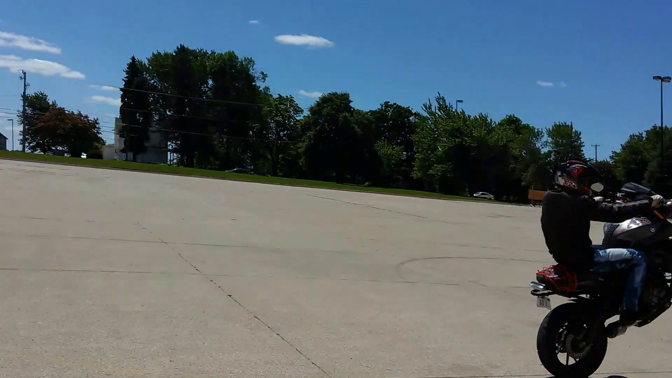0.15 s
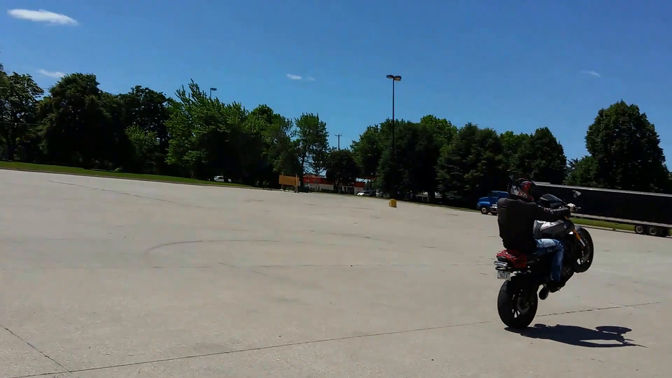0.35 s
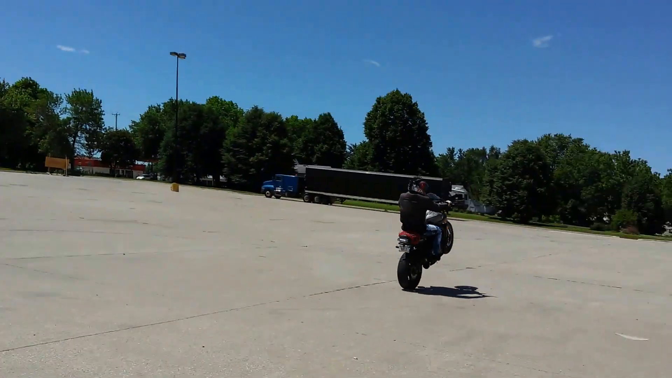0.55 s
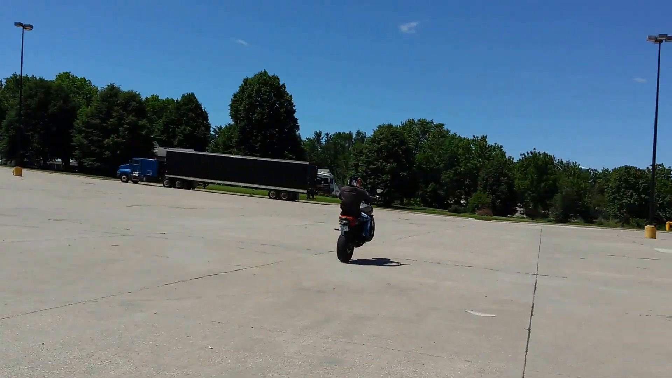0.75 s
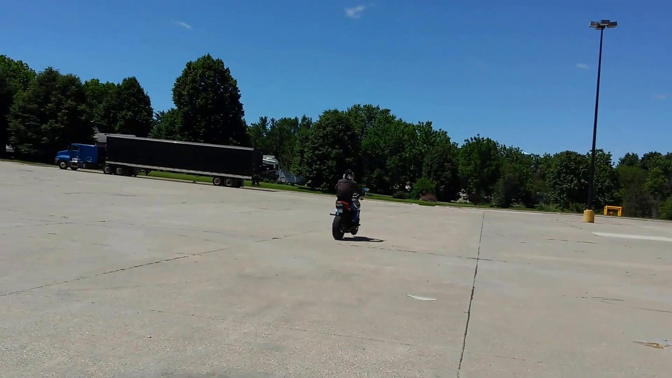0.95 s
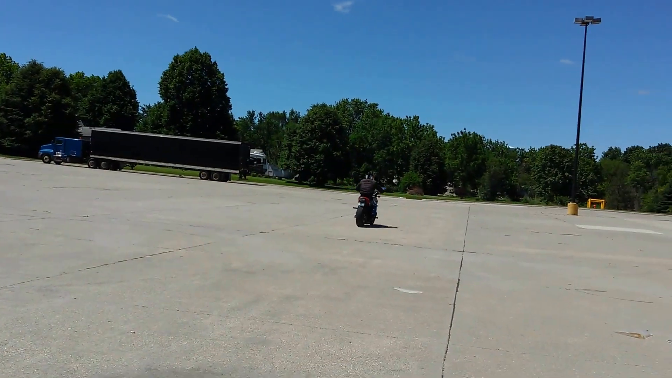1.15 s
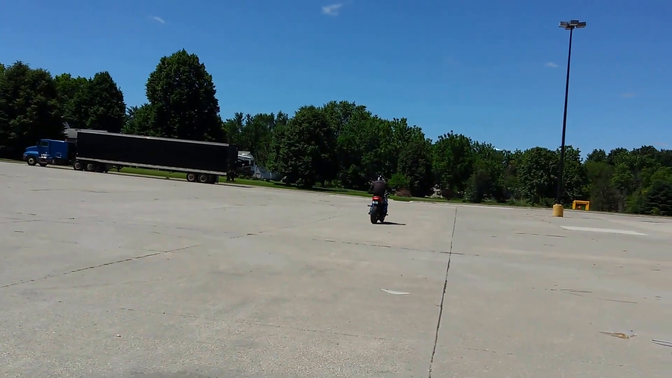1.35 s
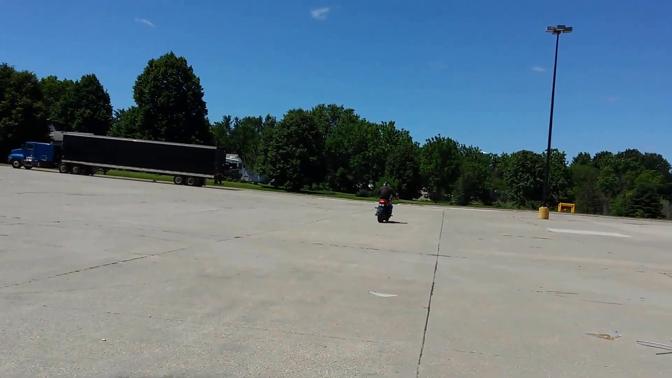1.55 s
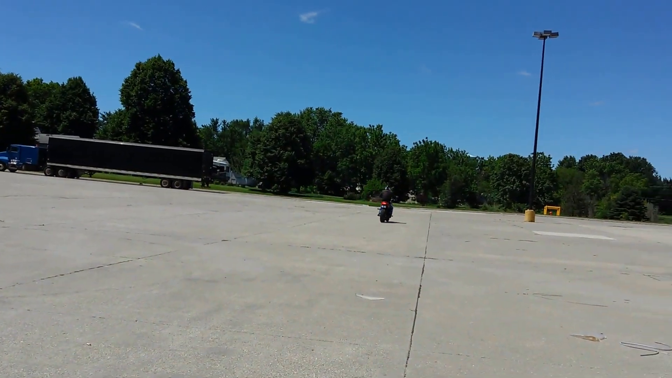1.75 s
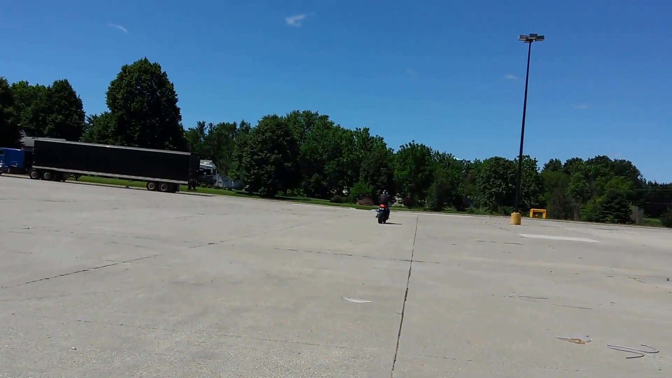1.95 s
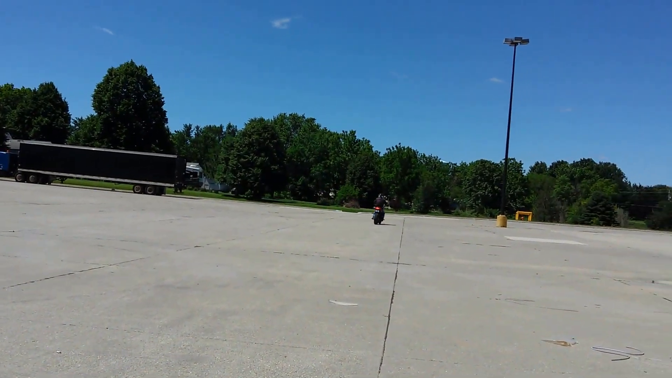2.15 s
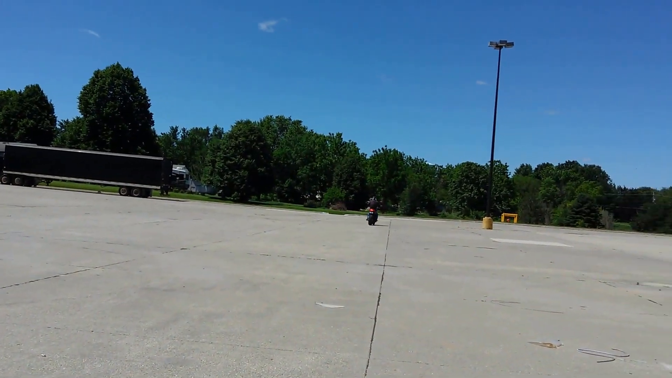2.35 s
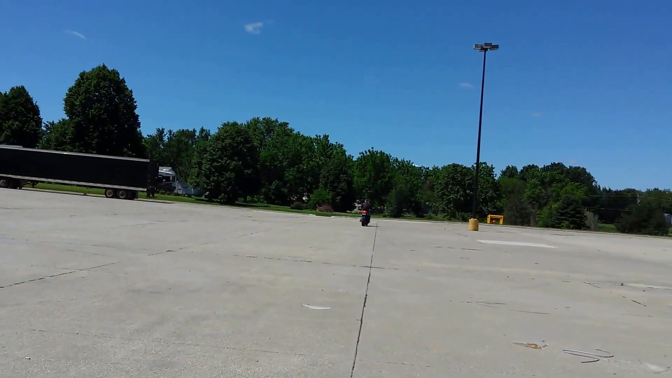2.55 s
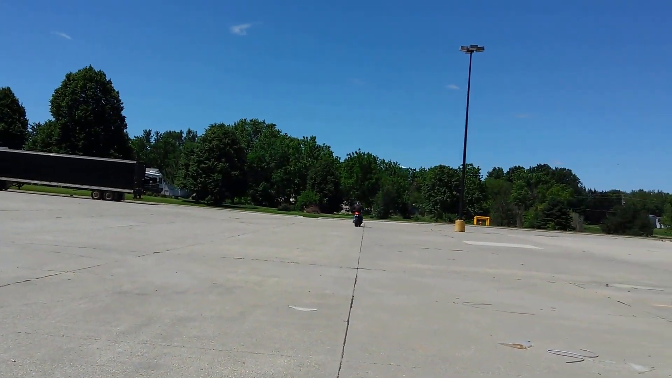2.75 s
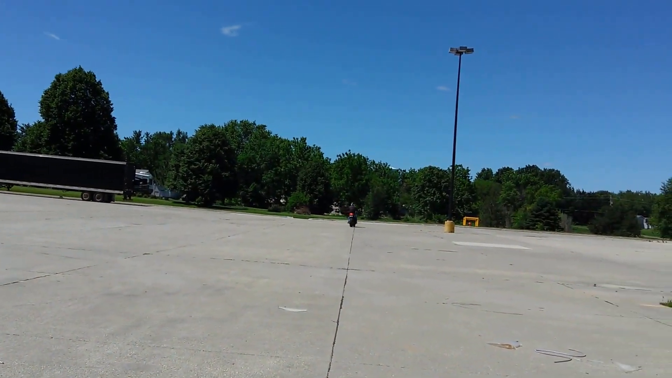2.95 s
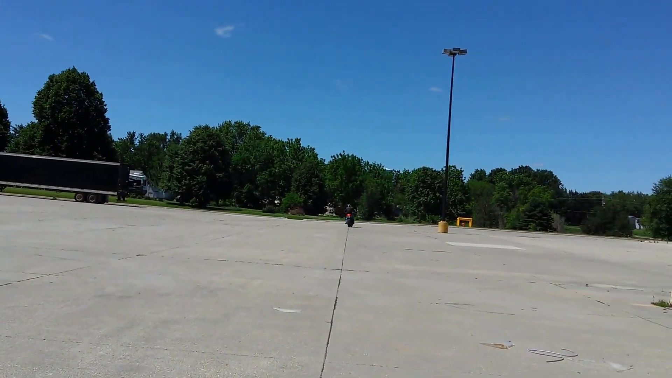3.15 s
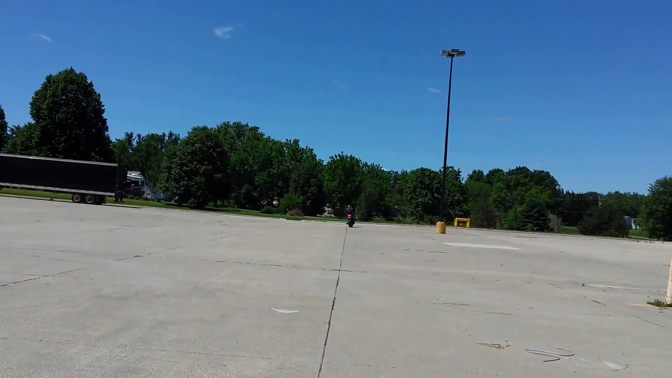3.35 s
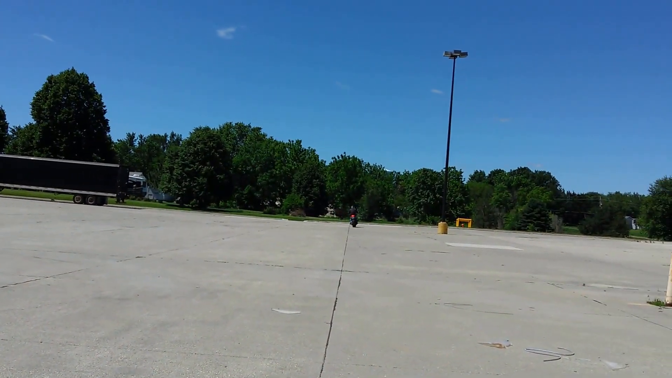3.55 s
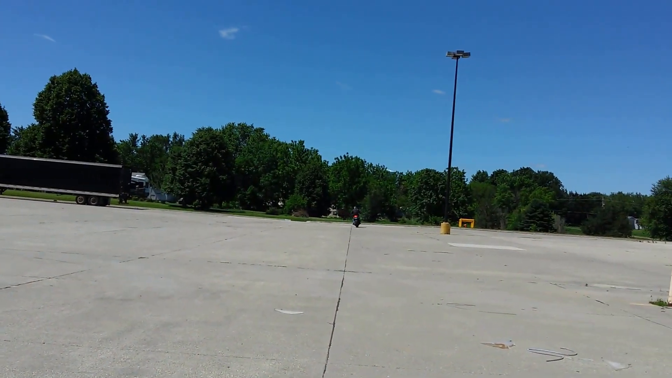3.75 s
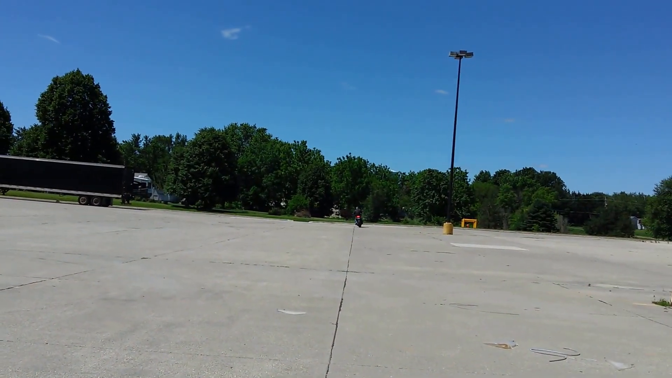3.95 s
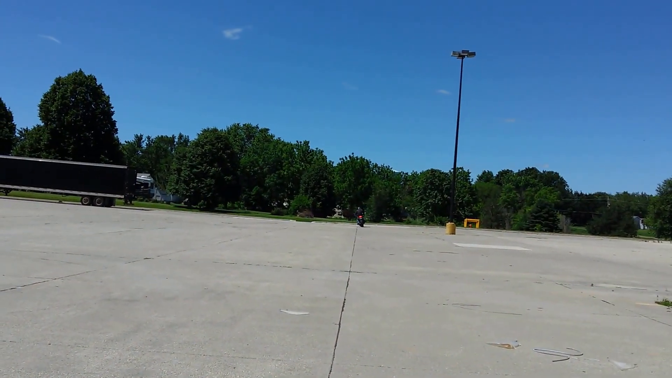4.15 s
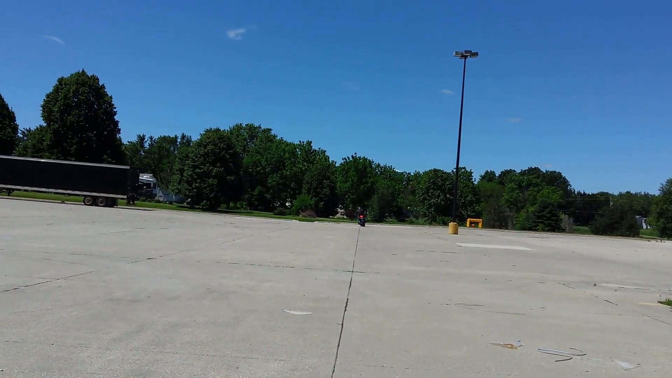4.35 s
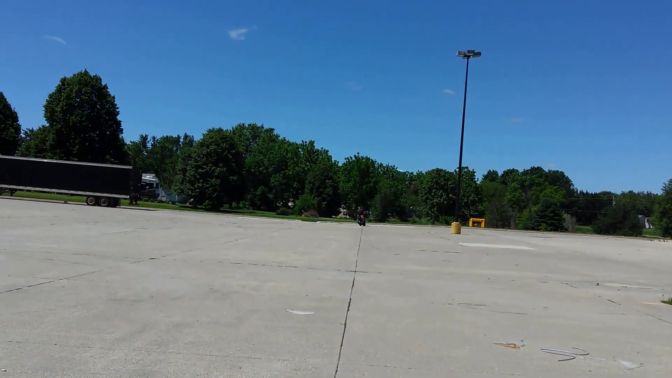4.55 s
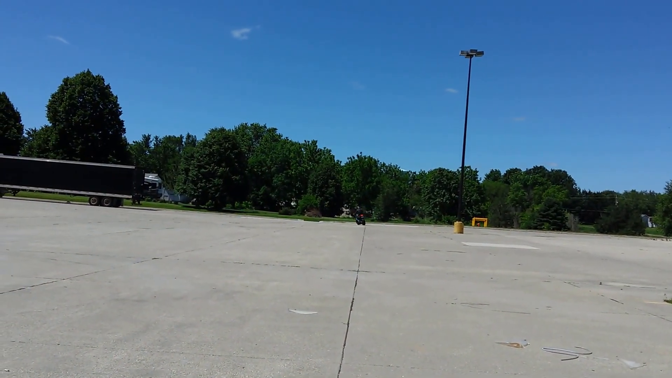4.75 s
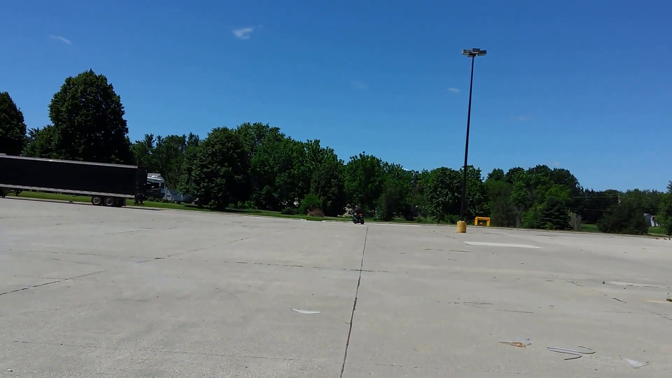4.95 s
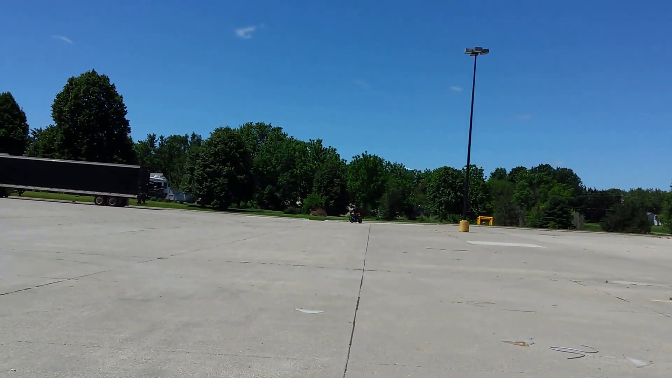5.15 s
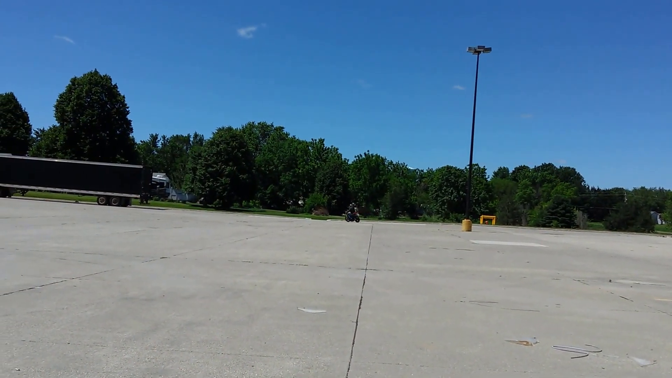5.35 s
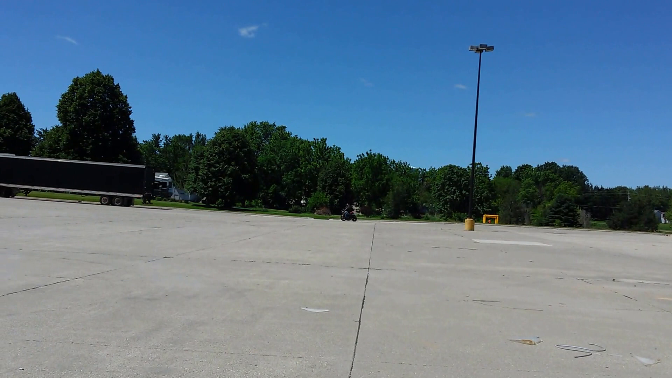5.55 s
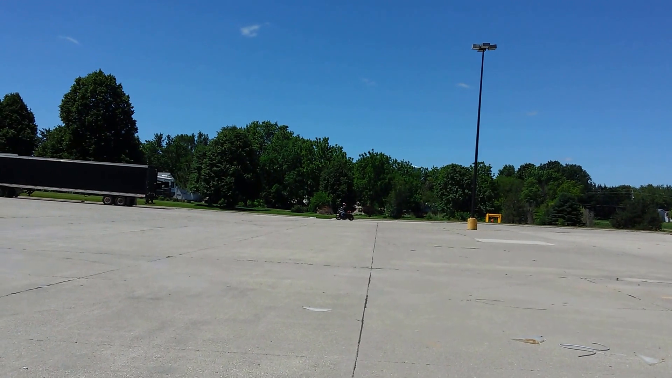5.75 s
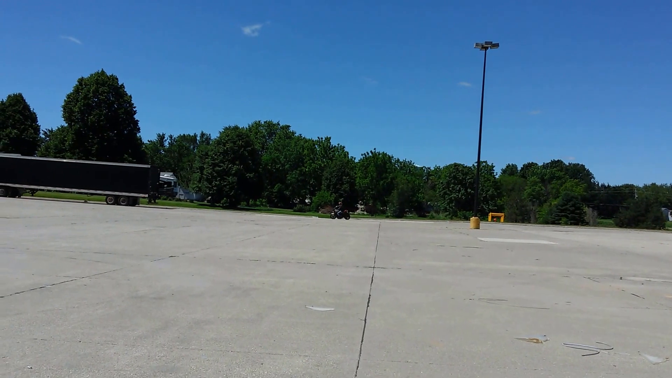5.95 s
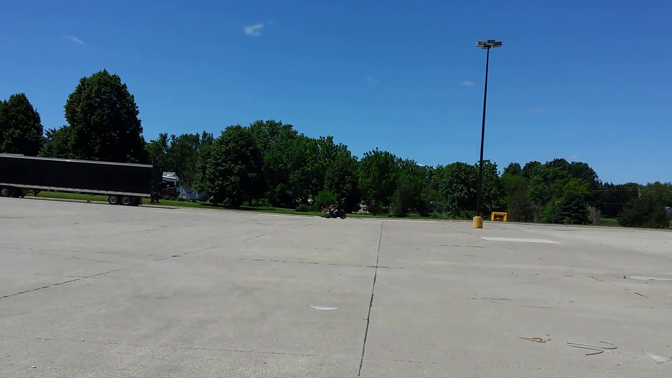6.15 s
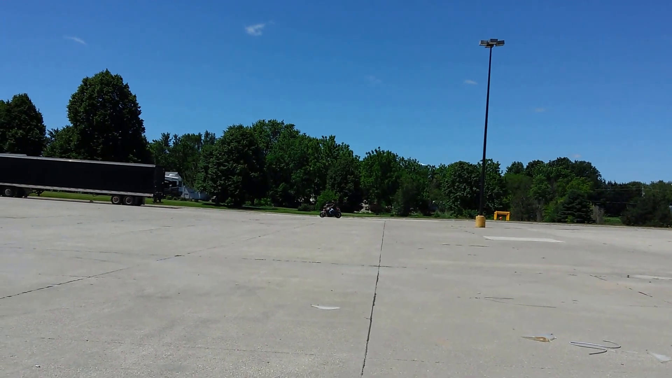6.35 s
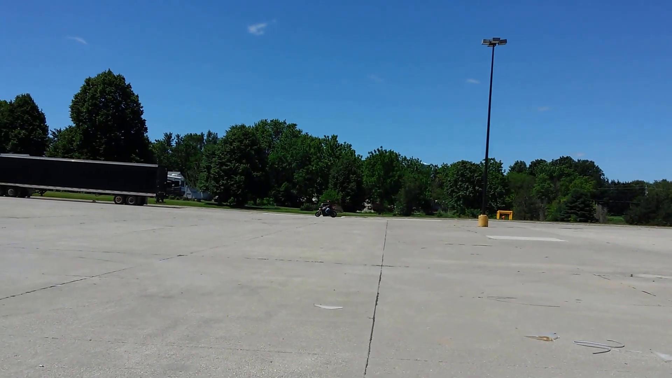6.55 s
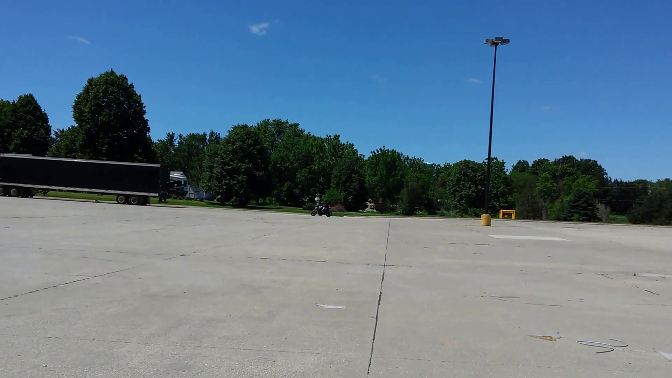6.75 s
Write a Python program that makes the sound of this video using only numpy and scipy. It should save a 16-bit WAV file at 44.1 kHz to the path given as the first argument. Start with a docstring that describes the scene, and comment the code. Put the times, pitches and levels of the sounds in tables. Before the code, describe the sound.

Close raspy motorcycle engine climbs briefly, drops into a long sinking hum, then distant burbling idle with small pops, faint bird buzzes and breeze.

```python
"""A three-cylinder motorcycle pulls away hard across an open paved lot, then shuts its throttle and coasts down.
Its exhaust note, a sum of engine orders, sinks and beats against far echoes; noise and gear whine go with it.
Far off it idles unevenly, each pop a burst that rings the pipe. A small bird buzzes in runs of
short falling whistles; shaped noise makes the air and the light breeze that fill the lot."""
import sys
import numpy as np
from scipy import signal
from scipy.fft import rfft, irfft, next_fast_len
from scipy.io import wavfile
from scipy.ndimage import uniform_filter1d, map_coordinates

SR = 44100
rng = np.random.default_rng(int(sys.argv[2]) if len(sys.argv) > 2 else 0)


def boost_factor(decibels):
    """Convert a level in decibels to a linear amplitude factor."""
    exponent = np.asarray(decibels, float) / 20
    return 10 ** exponent


def store_wav(level_fs):
    """Save 16-bit WAV to argv[1]."""
    pcm = np.round(np.clip(np.atleast_2d(level_fs), -1, 1) * 32767)
    wavfile.write(sys.argv[1], SR, pcm.T.astype(np.int16))


N = 299880

# The engine under power, then coasting. Each row: time in seconds, firing rate in Hz,
# level of the firing tone in dB before echoes.
ENGINE_RUN = [(0.03, 147.6, -15.5), (0.2, 146.3, -15.5), (0.31, 146, -23), (0.42, 147.9, -18.5),
              (0.55, 149.5, -16), (0.7, 153.5, -19), (0.88, 158.2, -14.5), (1.07, 162.5, -17),
              (1.11, 170, -16.5), (1.155, 161.6, -16.5), (1.2, 166.2, -11), (1.3, 172.1, -19),
              (1.37, 176.5, -29), (1.385, 169.6, -33), (1.41, 163.5, -11), (1.47, 160, -10.5),
              (1.89, 157.4, -11.5), (2.2, 137, -12.5), (2.41, 130.2, -12.5), (2.6, 122.4, -15),
              (2.88, 107.6, -15), (3.28, 93.8, -20.5), (3.82, 75.13, -23.5), (4.2, 63.5, -30.5),
              (4.6, 51.16, -36.5)]
# The idle. Each row: time in seconds, firing rate in Hz, drone level in dB,
# middle level in dB of the ordinary firings before scatter and trim.
IDLE_RUN = [(3.2, 29.42, -33, -14), (4.0, 28.55, -37, -26.5), (4.65, 28.2, -35, -27),
            (5.07, 36.03, -37, -26.5), (5.59, 37.9, -36, -31), (6.2, 35.45, -42, -27.5),
            (6.3, 37.03, -34.5, -20.5), (6.5, 36.03, -33.5, -22.5), (6.58, 35, -43, -22.5),
            (6.8, 34.3, -42, -22)]
# Gas and machinery noise. Each row: time in seconds, then growl, rasp and hiss levels in dB before trims.
NOISE_LEVELS = [(0.03, -25.5, -29, -31.5), (0.31, -27.5, -36.5, -36.5), (0.45, -26, -37.5, -40),
                (0.72, -26.5, -37, -44), (1.15, -37, -37.5, -43), (1.36, -30, -38, -42),
                (1.47, -29, -40.5, -46), (1.53, -28, -35.5, -41), (1.6, -35, -37.5, -45),
                (1.83, -33.5, -37.5, -48.5), (2.24, -26, -37, -49), (2.61, -30, -38.5, -51.5),
                (2.72, -28.5, -41.5, -53.5), (3.02, -35.5, -43, -56), (3.12, -30.5, -47.5, -61),
                (3.5, -31.5, -50.5, -65), (3.62, -36.5, -48, -60), (4.52, -40, -61, -76.5),
                (6.13, -47.5, -62, -90), (6.58, -49.5, -59, -74)]


def unit(x):
    """Normalization: the signal is scaled to rms 1."""
    return x / np.sqrt(np.mean(x ** 2) + 1e-20)


def along(points, hz):
    """Interpolation of (Hz, value) points on a logarithmic frequency axis."""
    f, v = np.transpose(points)
    return np.interp(np.log(hz + 1), np.log(f + 1), v)


def curves(rows):
    """Linear interpolation in time: one value per sample for each column after the time."""
    s, *columns = np.transpose(rows)
    return [np.interp(np.arange(N) / SR, s, column) for column in columns]


def wobble(rate):
    """Band-limited random modulation: a smooth curve through `rate` random knots a second."""
    knots = rng.standard_normal(int(N * rate / SR) + 4)
    return map_coordinates(knots, [np.arange(N) * rate / SR])


def filtered(x, response):
    """Linear filtering: the spectrum is multiplied by a response of frequency."""
    m = next_fast_len(N + SR // 4)
    return irfft(rfft(x, m) * response(np.fft.rfftfreq(m, 1 / SR)), m)[..., :N]


def rush(gain, patchy_db, gate=1):
    """Partly coherent stereo noise of rms 1, its time-frequency patches randomly stronger or weaker."""
    # Each row: frequency in Hz, left-right likeness from 0 to 1.
    likeness = [(25, .8), (60, 1), (500, 0.82), (1500, 0.56), (4000, 0.41), (15000, 0.25)]
    z = signal.stft(rng.standard_normal((2, N)), nperseg=512)[2]
    field = rng.standard_normal(z.shape[1:])
    field = uniform_filter1d(uniform_filter1d(field, 6, 0), 12, 1)
    pair = gate * signal.istft(z * boost_factor(patchy_db * unit(field)), nperseg=512)[1][:, :N]

    def mid_side_gain(hz):
        turn = np.arccos(np.clip(along(likeness, hz), -1, 1)) / 2
        return gain(hz) * [np.cos(turn), np.sin(turn)]

    mid, side = filtered(pair, mid_side_gain)
    return unit(np.array([mid + side, mid - side]))


def line(angle, db, flutter_db, smear):
    """Scintillation: moving air and echoes shake one order's level and phase, slightly apart at each side."""
    shake = smear * wobble(22) + 0.081 * wobble(1.26) * np.array([[1], [-1]])
    return np.sqrt(2) * boost_factor(db + flutter_db * wobble(18)) * np.cos(angle + shake)


def firing_angle():
    """Phase is the integral of frequency: the firing cycle through the rev, the coast and the idle."""
    revs, idle = curves(ENGINE_RUN)[0], curves(IDLE_RUN)[0]
    rate = np.where(np.arange(N) < SR * ENGINE_RUN[-1][0], revs, idle)
    return 2 * np.pi * np.cumsum(rate) / SR


def lot(x):
    """Diffuse reverberation: trees and trailers send back a late, thin wash, different at each side."""
    t = np.arange(SR // 2) / SR
    # decays 60 dB in 0.5 s, starting 12 ms late
    tail = rng.standard_normal((2, len(t))) * boost_factor(-60 * t / 0.5) * (t > .012)
    return signal.fftconvolve(x[None], tail / np.linalg.norm(tail[0]), axes=1)[:, :N]


def open_air():
    """Steady broadband noise: the air and distant hiss of the lot."""
    # Each row: frequency in Hz, relative spectral level in dB.
    air_color = [(240, -26), (400, 0.5), (488, -5), (1000, -1.5), (1150, 5), (1440, -1.5), (2120, -2),
                 (3840, -15.5), (9190, -34), (15400, -20)]
    return boost_factor(-56.5) * rush(lambda hz: boost_factor(along(air_color, hz)), patchy_db=0.0)


def light_breeze():
    """Low-frequency noise with slow amplitude modulation: a breeze that swells and sinks."""
    # Each row: frequency in Hz, relative spectral level in dB.
    breeze_color = [(15, -14), (30, 4), (60, -8.5), (120, 14.5), (300, -120)]
    level_db = -46.5 + 1.5 * wobble(2.68)
    return boost_factor(level_db) * rush(lambda hz: boost_factor(along(breeze_color, hz)), patchy_db=4.0)


def bird():
    """A pulse train of frequency-modulated tones: short scratchy falling whistles under one swell."""
    # Each row: start in seconds, length in seconds, middle pitch in Hz, clicks per second,
    # level in dB before flutter and the lot's wash.
    buzzes = [(3.59, .18, 4550, 84, -48.5), (4.82, .26, 4400, 83, -52.5), (6.46, .17, 4050, 83, -55),
              (6.58, .22, 3100, 83, -53.5)]
    t, out = np.arange(N) / SR, np.zeros(N)
    for start, length, hz, rate, db in buzzes:
        cycle = ((t - start) * rate) % 1
        swell = np.sin(np.pi * np.clip((t - start) / length, 0, 1) ** .65) ** 0.91
        click = np.exp(-((cycle - .5) / .15) ** 2)
        pitch = hz * (1 - .35 * (cycle - .5) + .05 * wobble(900))
        whistle = np.sin(2 * np.pi * np.cumsum(pitch) / SR)
        out += boost_factor(db + 2.1 * wobble(63)) * swell * click * whistle
    return out + boost_factor(-7) * lot(out)


def idle_drone():
    """Resonance: at idle the pipe's lowest mode picks out twice the firing rate."""
    drone_db = curves(IDLE_RUN)[1]
    hum = line(2 * firing_angle(), drone_db, flutter_db=2.0, smear=0.5)
    return hum * np.clip((np.arange(N) / SR - ENGINE_RUN[-1][0]) / 0.086, 0, 1)


def exhaust_blows():
    """Random timing and level: strong pops, with ordinary uneven firings between them at the idle rate."""
    # Strong thuds. Each row: time in seconds, level in dB before the pipe and trim.
    pops = [(3.256, -14.5), (3.328, -13), (3.3876, -15), (3.5134, -18.5), (3.5477, -14.5), (3.6381, -16),
            (3.7253, -18), (3.9034, -17.5), (4.1723, -19), (4.2359, -17), (4.3867, -18), (4.528, -22),
            (4.6773, -20), (4.7174, -21), (4.7545, -18), (4.8603, -25.5), (4.9779, -20.5), (5.0834, -21.5),
            (5.1696, -22.5), (5.3083, -22), (5.4934, -21), (5.5453, -23), (5.7022, -19.5), (5.727, -21.5),
            (5.7529, -23), (5.8677, -23.5), (5.953, -23), (5.9824, -24), (6.156, -21.5), (6.2746, -20.5),
            (6.302, -20.5), (6.4074, -23), (6.461, -26), (6.6674, -19), (6.694, -19.5), (6.7906, -23.5)]
    rate, _, usual_db = curves(IDLE_RUN)
    blows = list(pops)
    for (before, _), (after, _) in zip(pops, pops[1:]):
        count = round((after - before) * rate[int(before * SR)])
        for s in np.linspace(before, after, count + 1)[1:-1]:
            level_db = usual_db[int(s * SR)] + rng.normal(0, 2.6)
            blows.append((s + rng.normal(0, .0025), level_db))
    return blows


def thuds():
    """Impulse response: each blow sucks, pushes and rings the pipe's modes, with a burst of cracking noise."""
    # Modes of the pipe. Each row: frequency in Hz, relative level in dB, 60 dB decay time in seconds;
    # frequency and level scatter about these from blow to blow.
    pipe_modes = [(174.2, 2.5, 0.076), (91, 0.5, 0.051), (319.6, -13.5, 0.051)]
    # Backfires that crack. Each row: time in seconds, level in dB before the noise gain and band.
    backfires = [(3.257, -21), (3.328, -29), (3.442, -26), (3.757, -32), (3.881, -32), (4.235, -34),
                 (4.287, -34), (4.717, -34), (4.756, -33), (5.172, -34), (5.308, -35)]
    blows = exhaust_blows()
    lead = 400  # samples ahead of the blow
    t = np.arange(-lead, SR // 8) / SR
    rise = np.exp(-(np.minimum(t, 0) / 0.0042) ** 2)
    booms, cracks = np.zeros((2, N + SR))
    for s, db in blows:
        ring = 0
        for hz, mode_db, t60 in pipe_modes:
            decay = boost_factor(mode_db + rng.normal(0, 1.3) - 60 * np.maximum(t, 0) / t60)
            ring = ring + decay * np.cos(2 * np.pi * hz * (1 + 0.089 * rng.normal()) * t)
        booms[round(s * SR) - lead:][:len(t)] -= boost_factor(db - 3.0) * rise * ring

    # every thud also carries a faint crack, 25 dB under its table level
    for s, db in backfires + [(s, db - 25) for s, db in blows]:
        envelope = np.clip((t + .003) / .0015, 0, 1) * boost_factor(db - 60 * t / .016)
        tone = np.cos(2 * np.pi * rng.uniform(500, 850) * t)
        puff = envelope * (1.6 * rng.standard_normal(len(t)) - .5 * tone)
        cracks[round(s * SR) - lead:][:len(t)] += puff

    def boom_band(hz):
        return 1 / (1 + (55 / (hz + 1)) ** 4)

    def crack_band(hz):
        return (hz / 500) ** 2 / (1 + (hz / 500) ** 2) / (1 + (hz / 1300) ** 3)

    return filtered(booms[:N], boom_band) + filtered(cracks[:N], crack_band)


def far_pops():
    """Interaural-style delay: the far pops reach the left port first, with a faint wash from the lot."""
    pops = thuds()
    later = boost_factor(0.5) * np.roll(pops, 4)  # samples
    return np.array([pops, later]) + boost_factor(-21) * lot(pops)


def gear_whine():
    """Tooth-mesh frequency: gear teeth give two thin whistles at fixed multiples of the firing rate."""
    # Each row: time in seconds, whine level in dB over the rasp's table level.
    whine_over_rasp = [(0, -16), (.35, -15), (.47, -24), (.6, -17), (.92, -16), (1.0, -30), (2.2, -28),
                       (2.45, -17), (2.7, -21), (3.0, -14), (3.5, -17), (3.8, -30)]
    level_db = curves(NOISE_LEVELS)[1] + curves(whine_over_rasp)[0]
    angle = firing_angle()
    # unsteady phase, more blurred once far off
    blur = np.clip(np.arange(N) / SR / 2.5, .45, 1)
    return sum(line(multiple * angle + 1.3 * blur * wobble(170), level_db + db, flutter_db=5, smear=3)
               for multiple, db in ((31, 0), (32, -3)))


def gas_noise():
    """Turbulence noise: rasp and hiss puff once a firing and ring the engine cases, over a growl."""
    # Noise colors. Each row: frequency in Hz, relative spectral level in dB.
    growl_color = [(30, -120), (45, -14.5), (90, 7.5), (180, 14), (350, 7), (600, -2), (900, -8.5),
                   (1300, -16.5), (2500, -120)]
    rasp_color = [(470, -16), (800, -2.5), (1300, -3.5), (1450, -11), (1780, -1.5), (2230, -7), (3530, -11),
                  (3890, -13), (5500, -17), (7150, -21), (12100, -120)]
    hiss_color = [(2650, -43.5), (4500, -9.5), (4740, -1), (5230, -0.5), (8020, 5.5), (8990, 2),
                  (9960, 2.5), (15400, -12)]
    # Rings of engine cases and fins. Each row: frequency in Hz, width in Hz, boost in dB.
    case_rings = [(1670, 380, 0.5), (3940, 134, 8), (4570, 290, 5), (6260, 550, 2.5), (8730, 210, -2),
                  (10000, 400, 3)]

    def cases(hz):
        return boost_factor(sum(db / (1 + (2 * (hz - center) / width) ** 2) for center, width, db in case_rings))

    growl_db, rasp_db, hiss_db = curves(NOISE_LEVELS)
    puff = 1 + 0.086 * np.cos(firing_angle())
    growl = rush(lambda hz: boost_factor(along(growl_color, hz)), patchy_db=1.5)
    rasp = rush(lambda hz: boost_factor(along(rasp_color, hz)) * cases(hz), patchy_db=1.5, gate=puff)
    hiss = rush(lambda hz: boost_factor(along(hiss_color, hz)) * cases(hz), patchy_db=2.0, gate=puff)
    surge = wobble(8.7)
    growl = boost_factor(growl_db + 1.2 * wobble(12)) * growl
    rasp = boost_factor(rasp_db - 0.4 + 0.59 * surge) * rasp
    hiss = boost_factor(hiss_db + 1.36 + 0.27 * surge) * hiss
    return growl + rasp + hiss


def exhaust_note():
    """Harmonic synthesis: firing orders align in one sharp stroke, filtered by the pipe, beating with an echo."""
    # Bark: relative level in dB of each whole order of the firing rate, from the fourth up.
    bark = [3, 1, -3.5, -8, -13.5, -40, -12, -28, -29.5, -21.5]
    # The three cylinders differ, so lines stand at thirds of the firing rate: relative level in dB
    # of each from two thirds up to the third order, then of those above, which follow the bark.
    crank = [-10, 4, -15, -3.5, -8]
    upper_crank = [-15, -10.5, -14, -8, -7.5, -16.5, -14, -15, -17, -36, -48, -21, -17.5, -29.5, -33.5,
                   -21.5]
    # What the pipe lets through, throttle open and shut. Each row: frequency in Hz, level in dB.
    pipe_open = [(290, -14), (310, -18), (350, -21), (430, -23), (520, -26), (590, -32.5), (1200, -30.5),
                 (1480, -44), (1700, -34.5), (2200, -30)]
    pipe_shut = [(100, -22), (160, -19), (210, -17.5), (275, -24.5), (325, -22.5), (360, -23.5), (400, -48),
                 (480, -37), (640, -41), (900, -35)]
    # A far echo slips one more firing behind from row to row and cancels the firing tone there.
    # Each row: time in seconds, echo strength from 0 to 1.
    echo_fades = [(1.2, 0.02), (1.53, 0.17), (1.73, 0.14), (1.95, 0.2), (2.06, .2), (2.29, 0.07),
                  (2.465, 0.5), (2.66, .68), (2.8, 0.64), (3.06, 0.6), (3.36, .85), (3.71, .95), (4.1, 0.8),
                  (4.55, 0.3)]

    rate, tone_db = curves(ENGINE_RUN)
    angle, t = firing_angle(), np.arange(N) / SR
    shut_s, shut_takes_s = 1.349, 0.085  # the throttle shuts
    bark_shut_db = -6.5
    shut = np.clip((t - shut_s) / shut_takes_s + .5, 0, 1)
    beside = np.exp(-t / .2)  # stronger while close by
    # overtones sink with distance (dB a second), and faster once firing turns uneven
    sink_db = 2.5 * beside - 3.5 * np.maximum(t - shut_s, 0) - 8.5 * np.maximum(t - 3.17, 0)
    # no two firings bark quite alike
    close_db = 5.5 * beside + 1.0 * wobble(130)
    strength = np.clip(curves(echo_fades)[0], 0, .97)
    fade_s = np.transpose(echo_fades)[0]
    slip = 2 * np.pi * (.5 + np.interp(t, fade_s, np.arange(len(echo_fades))))

    def pipe_db(k, shut_db):
        when_open = along(pipe_open, k * rate)
        when_shut = along(pipe_shut, k * rate) + shut_db
        return sink_db + (1 - shut) * when_open + shut * when_shut

    def with_echo(k, start, db, **shake):
        both = (1 + strength * np.exp(-1j * k * slip)) / np.sqrt(1 + strength ** 2)
        return np.abs(both) * line(k * angle + start + np.angle(both), db, **shake)

    note = with_echo(1, 1.8, tone_db, flutter_db=.4, smear=.06)
    note += with_echo(2, 0, pipe_db(2, 0), flutter_db=.7, smear=.1)
    note += with_echo(3, 0, pipe_db(3, 0), flutter_db=1.2, smear=.12)
    for k, db in enumerate(bark, start=4):
        note += line(k * angle, pipe_db(k, bark_shut_db) + close_db + db, flutter_db=2, smear=.25)

    thirds = [k / 3 for k in range(2, 40) if k % 3]
    crank_db = sink_db + (1 - shut) * -32 + shut * -32.5
    bark_db = pipe_db(5, bark_shut_db) + close_db
    levels = [crank_db + db for db in crank] + [bark_db + db for db in upper_crank]
    for k, db in zip(thirds, levels):
        note += line(k * angle + 6 * rng.random(), db, flutter_db=2.5, smear=.16)
    return note * np.clip((ENGINE_RUN[-1][0] - t) / 0.035, 0, 1)


def off_the_ground(x):
    """Comb filtering: the pavement repeats the exhaust late; as the gap shrinks the notches sweep up."""
    # Each row: time in seconds, first notch in Hz, echo strength from 0 to 1.
    pavement_echo = [(0, 740, .6), (.1, 720, .65), (.19, 600, .85), (.27, 760, .8), (.5, 1250, .7),
                     (.7, 1600, .55), (1, 2600, .3), (1.5, 5000, .05)]
    notch_hz, strength = curves(pavement_echo)
    here = np.arange(N)
    # half a period late at the first notch
    late = np.array([np.interp(here - SR / (2 * notch_hz), here, side) for side in x])
    return (x + strength * late) / (1 + strength)


def scene():
    """Superposition of the motorcycle, its far pops, the bird, the open air and a light breeze."""
    bike = off_the_ground(exhaust_note()) + gas_noise() + gear_whine()
    return bike + idle_drone() + far_pops() + bird() + open_air() + light_breeze()


def roll_off(x):
    """The treble ends steeply here."""
    return signal.sosfilt(signal.butter(12, 15600, fs=SR, output="sos"), x)


def record(dry):
    """Two-port reception: level and phase differ between left and right at each frequency."""
    # Each row: frequency in Hz, phase lead of the left port in radians.
    phase_lead = [(1000, 0.011), (1500, 0.26), (4000, -0.79), (5200, -1.7), (10000, -1.8), (15000, -0.93)]
    # Each row: frequency in Hz, left over right level in dB.
    left_over_right = [(60, 1), (120, 1.0), (240, 2), (480, 3), (950, 2), (1890, -1.5), (3770, 5.5),
                       (7520, 3), (15000, -9)]
    side = np.array([[.5], [-.5]])
    # a very short fade keeps the start from clicking
    dry = dry * np.clip(np.arange(N) / 60, 0, 1)

    def port_response(hz):
        return boost_factor(along(left_over_right, hz) * side) * np.exp(1j * along(phase_lead, hz) * side)

    return roll_off(filtered(dry, port_response))


dry = scene()
out = record(dry)
store_wav(out)
```